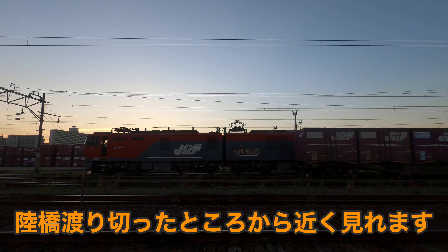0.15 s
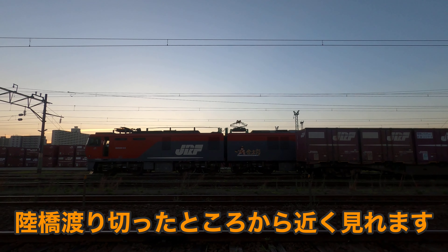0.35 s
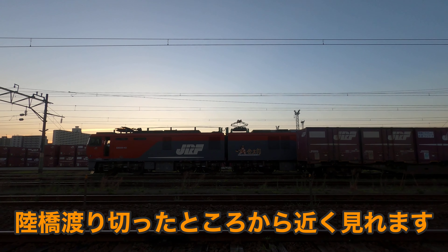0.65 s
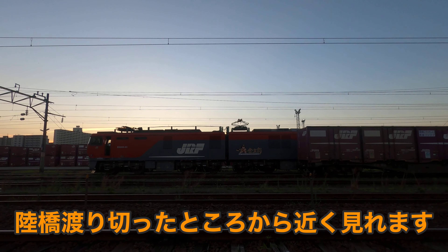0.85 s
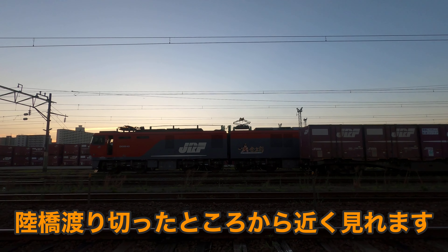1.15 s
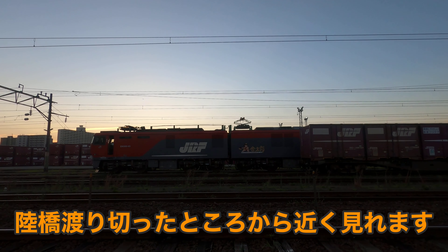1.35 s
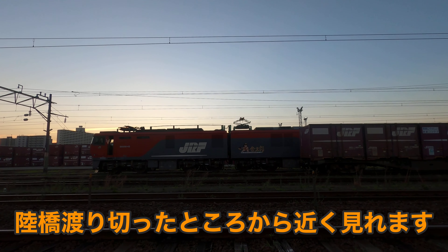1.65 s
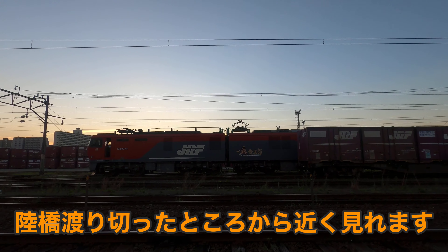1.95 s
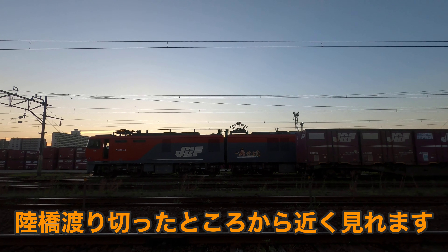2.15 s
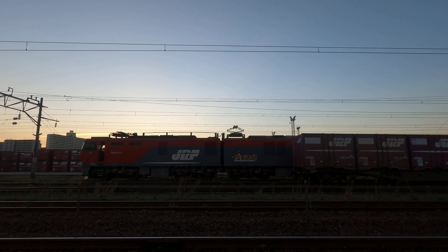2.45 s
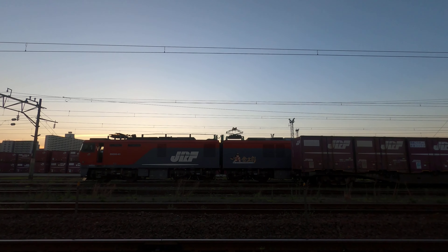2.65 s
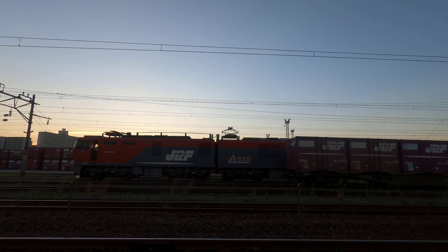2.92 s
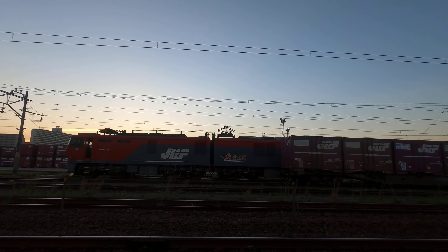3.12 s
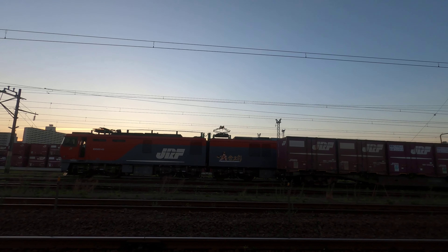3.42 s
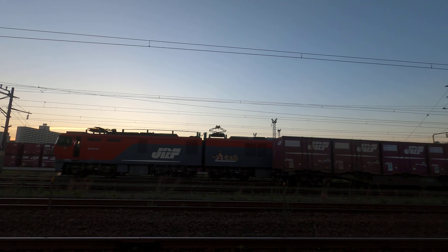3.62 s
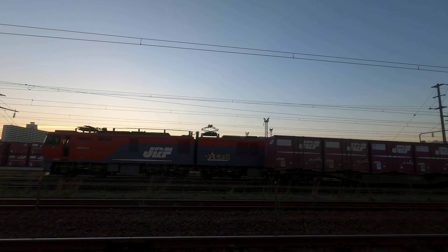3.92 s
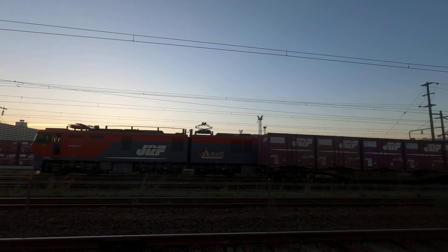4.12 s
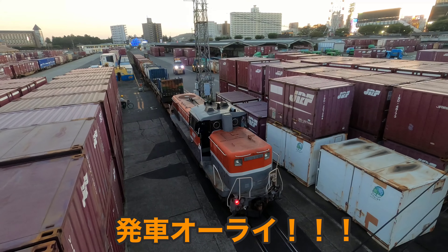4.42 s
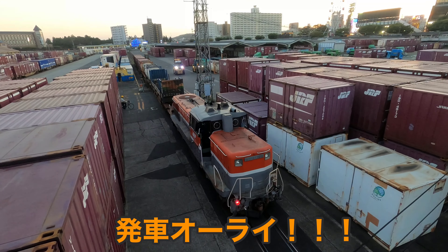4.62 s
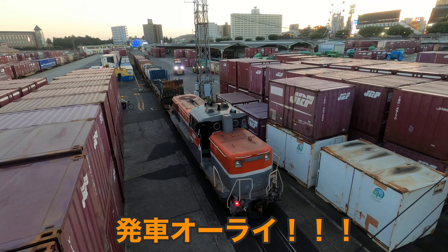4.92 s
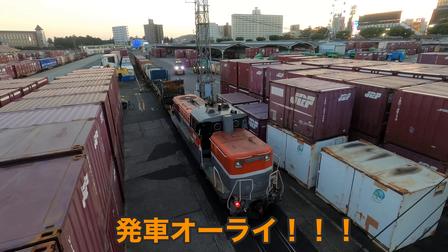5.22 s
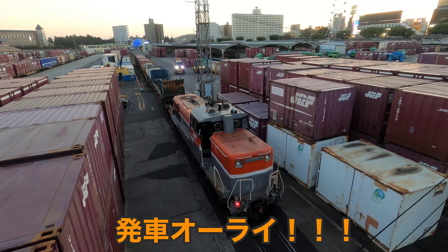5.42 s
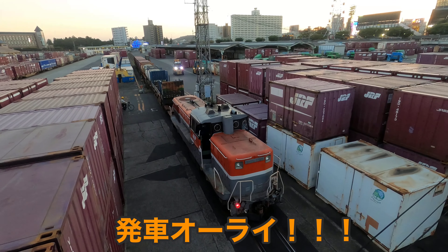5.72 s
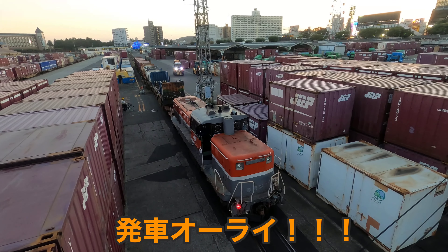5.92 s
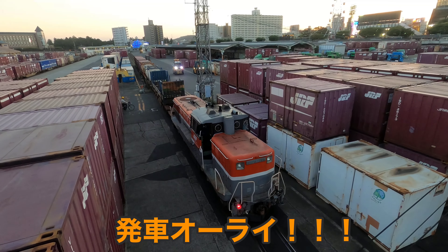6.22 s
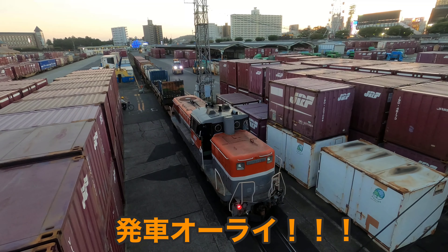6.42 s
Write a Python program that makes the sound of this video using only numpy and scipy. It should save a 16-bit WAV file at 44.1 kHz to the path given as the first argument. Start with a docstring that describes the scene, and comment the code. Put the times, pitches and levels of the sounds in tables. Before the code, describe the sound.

Outdoors in a rail yard, an electric locomotive with container wagons rumbles some way off, with irregular dull thuds, rushing blower air and a steady mid-low hum. A hard cut brings a closer diesel shunter creeping between container stacks: throbbing exhaust, metallic clatter, gear whine, regular air chuffs and broken, piercing wheel squeals. The microphone stays put within each view.

```python
"""Freight yard in two views

First an electric locomotive with container wagons some way off: shaped noise gives the rumble and blower
rush, damped low modes the dull thuds, and sines the blower tone and a faint whine.
After a hard cut a twelve-cylinder diesel shunter creeps past between container stacks: harmonics and pulsed
noise make its exhaust and clatter, with pipe booms, a low throb, a gear whine, a breathy whistle, a chuffing
air compressor and a wheel that squeals in fits."""
import sys
import numpy as np
from scipy import signal
from scipy.fft import rfft, irfft
from scipy.io import wavfile
from scipy.ndimage import uniform_filter1d

SR = 44100
rng = np.random.default_rng(int(sys.argv[2]) if len(sys.argv) > 2 else 0)


def generate_wav(signal):
    """Clip the signal to [-1, 1] and save it as 16-bit WAV at the path in sys.argv[1]."""
    frames = np.transpose(np.atleast_2d(signal))
    scaled = np.clip(frames, -1, 1) * 32767
    pcm = np.round(scaled).astype(np.int16)
    wavfile.write(sys.argv[1], SR, pcm)


N = 289296
TIME = np.arange(N) / SR  # [s]

# Ground rumble of the train: (frequency [Hz], density [dB per Hz])
RUMBLE_SPECTRUM = [(8, -74), (20, -66), (31, -58.5), (48, -51), (62, -45), (72, -48), (88, -52.5),
                   (105, -56.5), (128, -53), (165, -50.5), (195, -57.5), (240, -65.5), (340, -74.5),
                   (700, -114)]
# Air rush of the motor blowers: (frequency [Hz], density [dB per Hz])
RUSH_SPECTRUM = [(200, -90), (330, -77), (420, -70.5), (540, -68.5), (640, -72.5), (700, -72.5),
                 (850, -80.5), (1300, -75.5), (1750, -77), (2900, -81.5), (3550, -86), (3900, -86),
                 (4700, -90), (5100, -95), (6600, -101.5), (7250, -106.5), (8300, -105), (11500, -119),
                 (13500, -124), (15000, -135)]
# Resonances of the blower ducts: (centre [Hz], width [Hz], height [dB])
DUCT_RESONANCES = [(945, 120, 9), (1143, 104, 4.5), (1283, 26, 7), (1460, 52, 4), (1556, 39, 4.5),
                   (2460, 80, 2)]
# Blade tone of the blower, before flutter: (time [s], level [dB])
BLADE_LEVEL = [(0, -38.5), (0.11, -36.5), (0.42, -41), (1.2, -41.5), (2.3, -39), (2.45, -35.5), (2.7, -39),
               (3.25, -38.5), (3.5, -39), (4.12, -40)]
# Faint electric whine, before the gain whine_db: (frequency [Hz], level [dB])
WHINE_LINES = [(10680, -95), (10799, -96), (10917, -100), (13200, -104), (13318, -105)]
BLADE_HZ = 504.0
# The rush grows slowly as the train draws level
RUSH_START_DB, RUSH_RISE_DB_PER_S = -0.5, 0.3


def electric_train(flutter_db=0.82, whine_db=2.0):
    """Broadband flow noise and tonal blade passing: rumble, rush through ducts, and a tone fluttering in open air."""
    rumble = evened(colour(rng.standard_normal(N), RUMBLE_SPECTRUM), share=0.49, window_s=0.027)
    air = echoes(rng.standard_normal(N), spread_s=0.03, echo_db=-19.5, count=5)
    rush_gain = from_db(RUSH_START_DB + RUSH_RISE_DB_PER_S * TIME)
    rush = rush_gain * colour(air, RUSH_SPECTRUM, DUCT_RESONANCES)
    blade_db = in_time(BLADE_LEVEL)
    blades = from_db(blade_db + flutter_db * drift(7.8)) * tone(BLADE_HZ)
    whine = sum(from_db(db + whine_db) * tone(hz + drift(20)) for hz, db in WHINE_LINES)
    return rumble + thuds() + rush + blades + whine


# Dull thuds: (start [s], envelope peak of the low mode [dB], envelope peak of the upper mode [dB])
THUD_ROWS = [(0.054, -33, -28), (0.251, -22.5, -40), (0.354, -38, -21.5), (0.415, -24, -36),
             (0.546, -18, -27), (0.764, -24, -38), (0.917, -21, -32), (1.156, -29, -25),
             (1.298, -28, -25.5), (1.592, -38, -27), (1.714, -18.5, -36), (1.799, -21, -40),
             (1.888, -27, -30), (2.021, -25, -40), (2.157, -27, -40), (2.386, -25, -34),
             (2.511, -18.5, -23.5), (2.931, -20, -34), (3.022, -21, -38), (3.22, -23.5, -27),
             (3.353, -26, -32), (3.402, -38, -25), (3.543, -21, -28), (3.651, -21.5, -34)]
# Low modes in which every thud rings: (frequency [Hz], time to the envelope crest [s])
THUD_RESONANCES = [(62.3, 0.012), (150, 0.0053)]


def thuds():
    """Modal response: each thud sets two damped modes swinging for a few cycles, in a mix of its own."""
    out = np.zeros(N)
    age = np.arange(SR // 4) / SR
    swings = []
    for hz, crest_s in THUD_RESONANCES:
        envelope = age / crest_s * np.exp(1 - age / crest_s)
        swings.append(envelope * np.sin(2 * np.pi * hz * age))
    for start, *modes_db in THUD_ROWS:
        first = int(start * SR)
        out[first:first + len(age)] += from_db(modes_db) @ np.array(swings)
    return out


# Engine load; the exhaust takes only a share of it: (time [s], level change [dB])
LOAD_CURVE = [(4.13, 0.6), (4.33, -0.5), (4.48, 1.2), (4.7, 1), (5.1, 0.4), (5.26, 3), (5.42, 0.6),
              (5.6, 0.5), (6.18, 1), (6.42, 0.5), (6.54, 0.5)]
CYCLE_HZ = 4.906  # four-stroke cycles per second


def diesel_shunter(hunt=0.0021, uneven_db=5.0, exhaust_share=0.59, cylinders=12):
    """Common excitation: one slightly hunting engine speed and one load drive both exhaust and clatter."""
    load_db = in_time(LOAD_CURVE)
    speed_hz = CYCLE_HZ * (1 + hunt * drift(1.0))
    fired = cylinders * np.cumsum(speed_hz) / SR  # running count of firings
    strength = from_db(uneven_db * rng.standard_normal(cylinders))
    firings = strength[fired.astype(int) % cylinders] * puffs(fired, crest_share=0.26)
    engine = from_db(exhaust_share * load_db) * exhaust(speed_hz, firings)
    engine = engine + from_db(load_db) * clatter(firings)
    engine = engine + firing_throb(fired)
    return engine + wheel_squeal() + gear_whine() + engine_whistle() + compressor()


# Exhaust harmonics, before waver and load: (multiple of the cycle rate [1], level [dB])
EXHAUST_ORDERS = [(6, -46), (8, -41), (9, -41), (11, -45), (13, -42), (14, -39), (15, -41), (16, -39),
                  (17, -41), (18, -43), (19, -40), (21, -38), (23, -46), (30, -43), (32, -39), (33, -39),
                  (34, -38), (35, -44), (36, -43), (38, -38), (39, -41), (40, -41), (41, -40), (42, -43)]
# Turbulent exhaust gas: (frequency [Hz], density [dB per Hz])
GAS_SPECTRUM = [(8, -69), (25, -59), (45, -49), (62, -53), (80, -54), (105, -54), (135, -51.5),
                (152, -48.5), (165, -47), (178, -51), (200, -50), (222, -54.5), (240, -60), (400, -79)]


def exhaust(speed_hz, firings, waver_db=1.0, gas_share=1.0):
    """Harmonic series: unequal cylinders sound multiples of the cycle rate; each firing also blows turbulent gas."""
    throb = sum(from_db(db + waver_db * drift(1.8)) * tone(order * speed_hz)
                for order, db in EXHAUST_ORDERS)
    gas = rng.standard_normal(N) * (1 + gas_share * firings)
    turbulence = evened(colour(gas, GAS_SPECTRUM), share=0.3, window_s=0.055)
    return throb + pipe_boom() + turbulence


# Booms of the exhaust pipe, before the gain boom_db and load: (crest time [s], level [dB], pitch [Hz])
BOOM_ROWS = [(4.14, -29, 163), (4.246, -24.5, 163), (4.45, -24, 187.4), (4.611, -22.5, 162.5),
             (4.761, -29.5, 197), (4.858, -22.5, 164), (5.042, -25, 188), (5.277, -22, 162.2),
             (5.419, -22, 159.6), (5.664, -19.5, 164), (5.857, -23.5, 190.8), (6.061, -24.5, 190.9),
             (6.16, -25, 163.8), (6.269, -24.5, 199), (6.367, -27.5, 164), (6.493, -24.5, 196.2)]


def pipe_boom(boom_db=-1.3, wander_hz=5.015):
    """Pipe resonance: the strongest cylinders pump the air column, which booms unevenly with a wandering pitch."""
    wander = wander_hz * drift(11.9)
    booms = sum(swells([(crest, db)], rise_s=0.029, fall_s=0.033) * tone(hz + wander)
                for crest, db, hz in BOOM_ROWS)
    return from_db(boom_db) * booms


# Surges of the firing tone, before SURGE_SHARE: (crest time [s], level [dB])
SURGE_ROWS = [(4.357, -33), (4.884, -22), (5.133, -32), (5.372, -24), (5.695, -27), (5.901, -20),
              (6.267, -25), (6.367, -26)]
FIRING_DB, SURGE_SHARE = -28.5, 0.36  # steady level; share of each surge added to it
HUM_HZ, HUM_DB = 50.0, -33.5
BEAT_S = 5.36  # a moment when firing tone and hum are in step


def firing_throb(fired, waver_db=0.5):
    """Beating of two close tones: the firing tone against a steady low hum, with surges now and then."""
    surge = SURGE_SHARE * swells(SURGE_ROWS, rise_s=0.02, fall_s=0.03)
    level = from_db(FIRING_DB + waver_db * drift(3)) + surge
    firing = level * np.cos(2 * np.pi * (fired - np.interp(BEAT_S, TIME, fired)))
    hum = from_db(HUM_DB) * np.cos(2 * np.pi * HUM_HZ * (TIME - BEAT_S))
    return np.sqrt(2) * (firing + hum)


# Engine clatter: (frequency [Hz], density [dB per Hz])
CLATTER_SPECTRUM = [(150, -89), (260, -62), (320, -61), (400, -57.5), (520, -57), (850, -64.5), (1250, -64),
                    (1700, -69.5), (2600, -71.5), (4500, -81), (7000, -92.5), (8600, -94.5), (11500, -108),
                    (14000, -114), (15700, -127)]
# Resonances of the bonnet and pipes: (centre [Hz], width [Hz], height [dB])
BONNET_RESONANCES = [(279, 27, 8), (314, 11, -5), (358, 28, 6), (676, 7.5, 2), (770, 70, 2), (840, 50, -1),
                     (935, 59, 2.5), (1070, 80, 5.5), (1161, 57, 5), (1220, 30, 3.5), (1250, 30, -1),
                     (1300, 24, 1), (1330, 12, 4), (1436, 40, 4), (1510, 23, 0.5), (2100, 230, 2.5),
                     (2830, 41, -0.5), (3690, 50, -5), (3830, 160, 1), (4530, 50, 4)]


def clatter(firings, knock=0.11):
    """Forced vibration: knock and valve gear shake the bonnet; the container stacks throw the sound back."""
    blows = rng.standard_normal(N) * (1 + knock * firings)
    reflected = echoes(blows, spread_s=0.1, echo_db=-20, count=12)
    return colour(reflected, CLATTER_SPECTRUM, BONNET_RESONANCES)


# Fits of squeal, before grip and flicker:
# (start [s], length [s], peak level [dB], peak overtone drive [dB], pitch [Hz])
SQUEAL_FITS = [(4.76, 0.084, -51, -88, 5315), (4.965, .075, -51, -88, 5322), (5.07, .015, -54, -88, 5330),
               (5.12, .025, -51, -88, 5340), (5.24, .014, -41, -73, 5320),
               (5.286, 0.039, -36.5, -62.5, 5300), (5.31, 0.06, -36.5, -69, 5320),
               (5.388, .016, -46, -77, 5290), (5.426, 0.013, -50, -88, 5280),
               (5.458, 0.088, -39.5, -79, 5315), (5.517, 0.12, -36, -84, 5309),
               (5.671, 0.039, -41, -69, 5306), (5.71, 0.086, -41, -77, 5300), (5.815, .018, -40, -84, 5327),
               (5.848, 0.026, -45, -86, 5315), (6.083, 0.085, -43.5, -76, 5300),
               (6.15, 0.061, -38, -68, 5295), (6.21, 0.021, -41.5, -88, 5325),
               (6.283, 0.023, -50.5, -79, 5350), (6.425, 0.08, -50, -81, 5295),
               (6.515, 0.029, -49, -81, 5320)]
# Overtones of the wheel: (ratio to the squeal pitch [1], level relative to the overtone drive [dB])
WHEEL_OVERTONES = [(2.002, 1.5), (2.516, -14)]
SINGING_DB = -61.5  # faint singing from the first fit onward
LOCKED_DB = -35.5  # reference level: the farther below it, the looser the grip


def wheel_squeal(sputter_per_db=0.038, jitter_hz=18, bite_flicker_db=4.0):
    """Stick-slip oscillation: one wheel mode sings, purest when strong and sputtering when weak."""
    level = bite = weight = weighted_hz = 0
    for start, length, db, overtone_db, hz in SQUEAL_FITS:
        fit = squeal_envelope(start, length)
        level = np.maximum(level, from_db(db) * fit)
        bite = np.maximum(bite, from_db(overtone_db) * fit)
        weight = weight + fit
        weighted_hz = weighted_hz + fit * hz
    level = np.hypot(level, from_db(SINGING_DB) * (TIME > SQUEAL_FITS[0][0]))
    loose = np.clip(sputter_per_db * (LOCKED_DB - 20 * np.log10(level)), 0.13, 0.45)
    pitch = weighted_hz / weight + jitter_hz * loose * drift(56)
    overtones = sum(from_db(part_db + bite_flicker_db * drift(35)) * tone(ratio * pitch)
                    for ratio, part_db in WHEEL_OVERTONES)
    grip = np.abs(1 + loose * drift(35))
    return grip * (level * tone(pitch) + bite * overtones)


SQUEAL_ATTACK_S, SQUEAL_RELEASE_S = 0.012, 0.013  # exponential time constants
CREST_SHARE, SWELL_DB, EASE_DB = 0.53, 2.5, 3  # crest position in the fit; rise to it; fall after it


def squeal_envelope(start, length):
    """Growth and decay of one oscillation: a quick catch, a swell to the crest, an easing and a ring-out; top 1."""
    age = TIME - start
    arch_db = np.interp(age / length, [0, CREST_SHARE, 1], [-SWELL_DB, 0, -EASE_DB])
    before = np.maximum(-age, 0) / SQUEAL_ATTACK_S
    after = np.maximum(age - length, 0) / SQUEAL_RELEASE_S
    return from_db(arch_db) * np.exp(-np.minimum(before + after, 20))


GEAR_HZ = 1354.0
GEAR_DB, GEAR_RISE_DB_PER_S = -44.5, 2  # level at the cut; its rise as the shunter nears


def gear_whine(flutter_db=1.8, waver_hz=1.63, rough_hz=3.4):
    """Tooth-mesh tone: meshing teeth give one thin line that wavers and is roughened by their backlash."""
    level_db = GEAR_DB + GEAR_RISE_DB_PER_S * (TIME - CUT_S) + flutter_db * drift(15)
    return from_db(level_db) * tone(GEAR_HZ + waver_hz * drift(3.1) + rough_hz * drift(40))


# Breathy whistle in the engine noise: (time [s], level [dB])
WHISTLE_CURVE = [(4.13, -62), (4.38, -53), (4.57, -38.5), (4.75, -51), (4.9, -38.5), (5.02, -48),
                 (5.22, -46), (5.4, -43.5), (5.51, -41.5), (5.59, -52), (5.7, -44), (5.85, -49),
                 (6.08, -43), (6.5, -53)]
WHISTLE_HZ = 2268.0


def engine_whistle(width_hz=42, waver_hz=16):
    """Narrow-band noise: slow noise on two quadrature carriers of wandering pitch, likely the turbocharger."""
    level_db = in_time(WHISTLE_CURVE)
    phase = 2 * np.pi * np.cumsum(WHISTLE_HZ + waver_hz * drift(3.99)) / SR
    breath = drift(width_hz) * np.cos(phase) + drift(width_hz) * np.sin(phase)
    return from_db(level_db) * breath


# Strokes of the air compressor, before the gain chuff_db: (crest time [s], level [dB])
STROKE_ROWS = [(4.236, -40.5), (4.357, -41), (4.488, -41.5), (4.619, -41), (4.75, -39.5), (4.873, -41.5),
               (4.999, -39.5), (5.13, -41), (5.262, -40), (5.39, -39), (5.531, -42), (5.643, -44),
               (5.769, -42), (5.887, -40.5), (6.022, -40.5), (6.153, -44), (6.286, -44), (6.403, -39.5),
               (6.54, -41)]


def compressor(chuff_db=-1.9, low_hz=2500, high_hz=4800):
    """Pulsed flow noise: the intake gasps once a stroke, as swells of band-limited noise."""
    band = signal.butter(2, [low_hz, high_hz], "band", fs=SR, output="sos")
    softened = signal.lfilter([1, 1], [1], rng.standard_normal(N))  # less treble
    air = signal.sosfilt(band, softened)
    return from_db(chuff_db) * swells(STROKE_ROWS, rise_s=0.018, fall_s=0.026) * rms_one(air)


def colour(x, spectrum, resonances=()):
    """Source-filter shaping: white excitation takes a density in dB per Hz plus humps; silent above the last point."""
    hz = np.maximum(np.arange(N // 2 + 1) * SR / N, 1)
    points = np.array(spectrum)
    level_db = np.interp(np.log(hz), np.log(points[:, 0]), points[:, 1], right=-np.inf)
    for centre, width, db in resonances:
        level_db = level_db + db / (1 + (2 * (hz - centre) / width) ** 2)
    return irfft(rfft(rms_one(x)) * from_db(level_db), N) * np.sqrt(SR / 2)


def echoes(x, spread_s, echo_db, count):
    """Comb filtering by reflection: delayed copies from ground and steel walls join the direct sound."""
    out = x.copy()
    for when, size in rng.random((count, 2)):
        delay = int(SR * spread_s * (when + 0.1))
        out += from_db(echo_db) * (0.5 + size) * np.roll(x, delay)
    return out


def puffs(turns, crest_share):
    """Pulse train: one puff per whole turn, cresting at 1 after crest_share of it and dying away."""
    age = (turns % 1) / crest_share
    return age * np.exp(1 - age)


def swells(rows, rise_s, fall_s):
    """Incoherent addition: a rounded swell for each (crest time [s], level [dB]), summed in power."""
    power = np.zeros(N)
    for crest, db in rows:
        age = TIME - crest
        slope_s = np.where(age < 0, rise_s, fall_s)
        power += from_db(db) ** 2 * np.exp(-np.minimum((age / slope_s) ** 2, 20))
    return np.sqrt(power)


def evened(x, share, window_s):
    """Envelope compression: takes a share of the chance swings out of a noise's level and keeps its power."""
    size = int(window_s * SR)
    power = uniform_filter1d(uniform_filter1d(x ** 2, size), size) + 1e-12
    return np.std(x) * rms_one(x / power ** (share / 2))


def drift(rate):
    """Low-passed noise: slow chance of rms 1 that changes about `rate` times a second."""
    hz = np.arange(N // 2 + 1) * SR / N
    return rms_one(irfft(rfft(rng.standard_normal(N)) / (1 + (hz / rate) ** 2), N))


def tone(hz):
    """Phase as the integral of frequency: a sine of rms 1 that follows a pitch."""
    turns = np.cumsum(hz * np.ones(N)) / SR + rng.random()
    return np.sqrt(2) * np.sin(2 * np.pi * turns)


def in_time(rows):
    """Linear interpolation of a (time [s], level [dB]) curve, sample by sample."""
    times, levels = np.transpose(rows)
    return np.interp(TIME, times, levels)


def from_db(db):
    """Logarithmic level: decibels to an amplitude ratio."""
    return 10 ** (np.asarray(db) / 20)


def rms_one(x):
    """Power normalisation: scales a signal to rms 1."""
    return x / np.sqrt(np.mean(x ** 2) + 1e-20)


CUT_S = 4.124


def scene():
    """Linear crossfade: the first view gives way to the second within 8 ms."""
    second = np.clip((TIME - CUT_S) / 0.008 + 0.5, 0, 1)
    mix = (1 - second) * electric_train() + second * diesel_shunter()
    return mix[None]


CUTOFF_HZ = 15700


def record(dry):
    """Band limiting: an elliptic low-pass cuts the top steeply."""
    lowpass = signal.ellip(10, 0.1, 80, CUTOFF_HZ, fs=SR, output="sos")
    return signal.sosfilt(lowpass, dry)


dry = scene()
out = record(dry)
generate_wav(out)
```